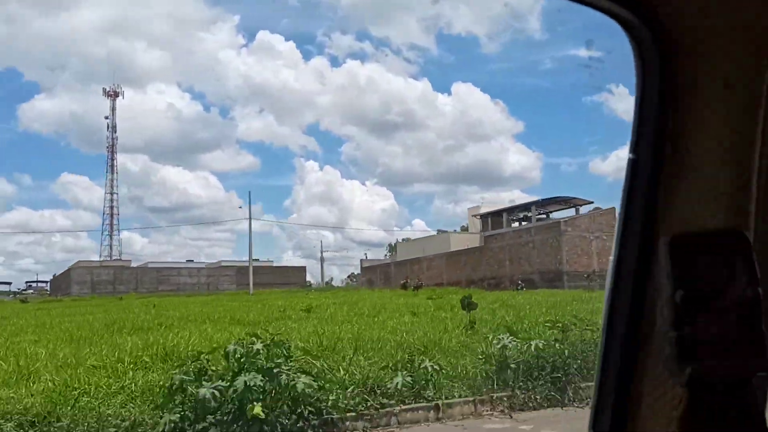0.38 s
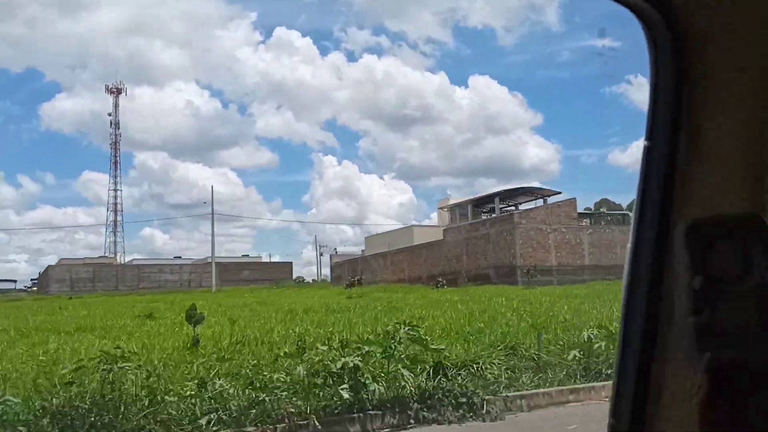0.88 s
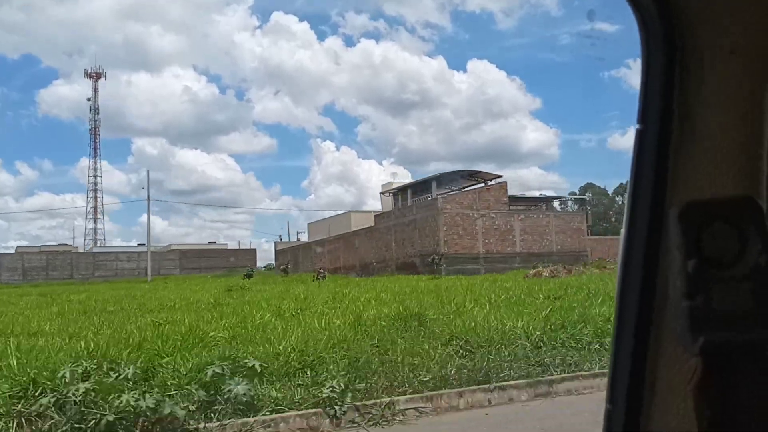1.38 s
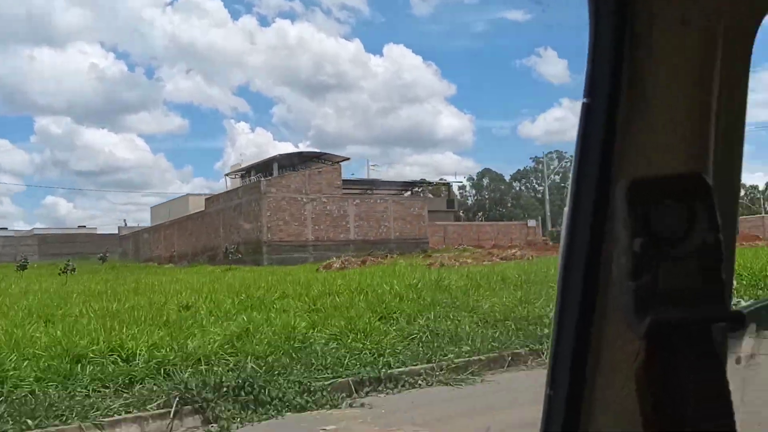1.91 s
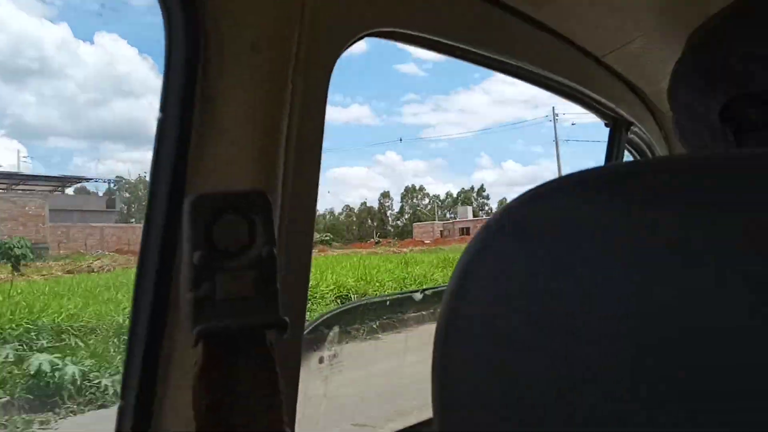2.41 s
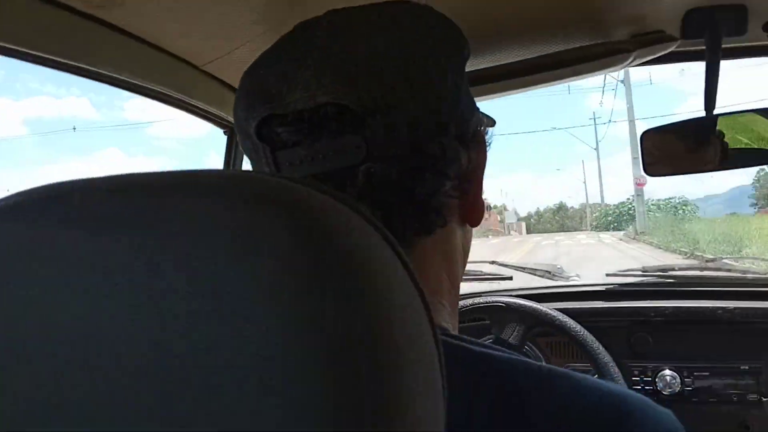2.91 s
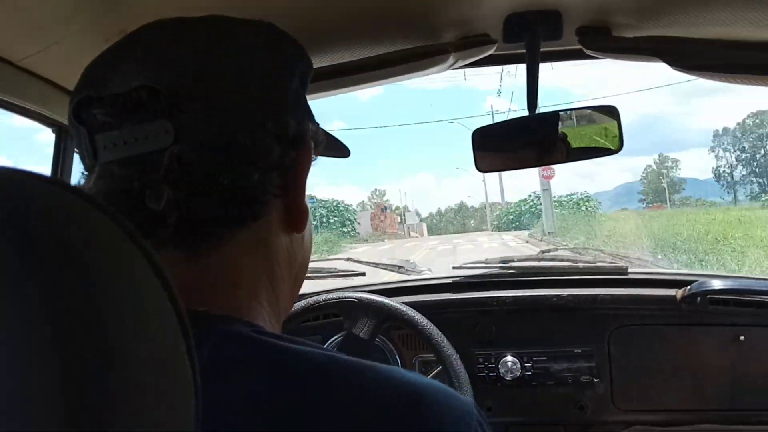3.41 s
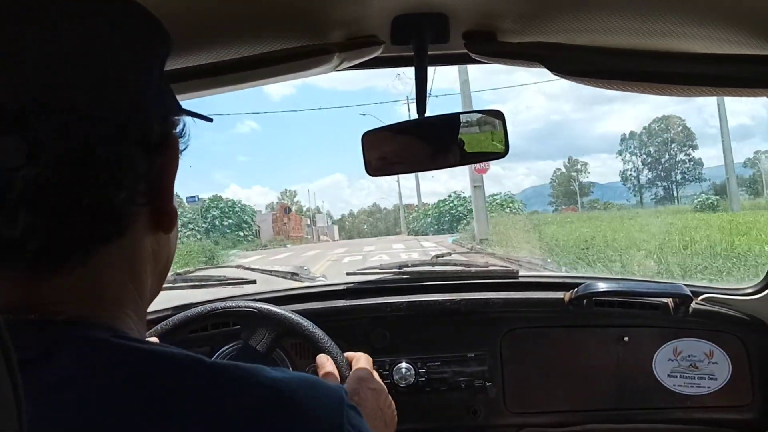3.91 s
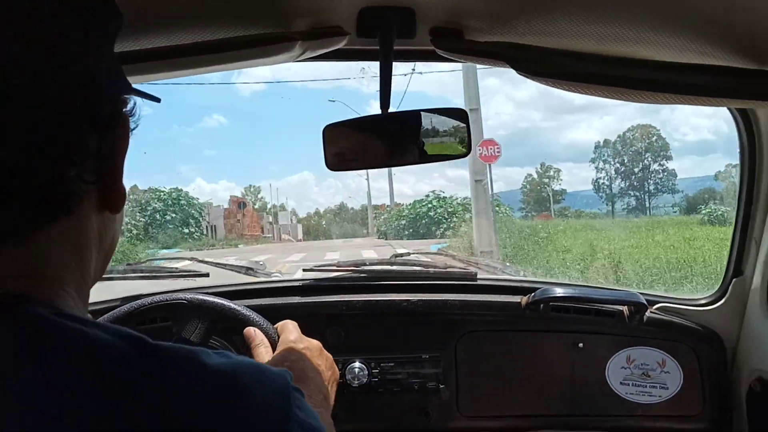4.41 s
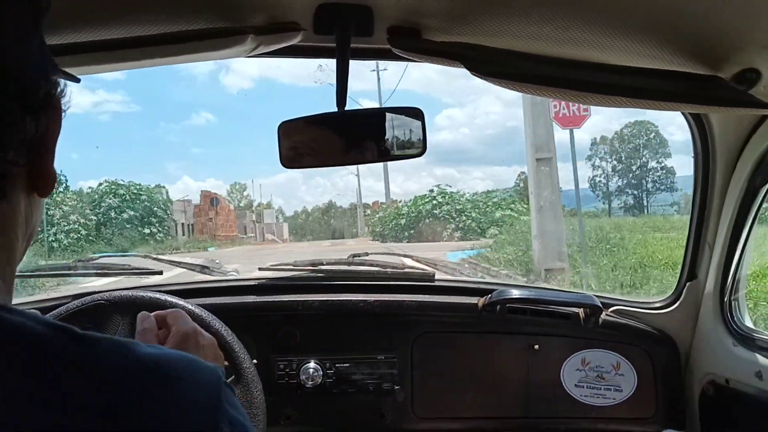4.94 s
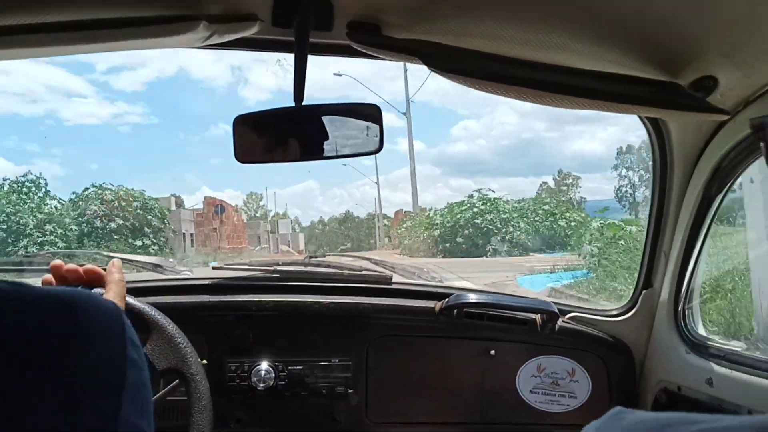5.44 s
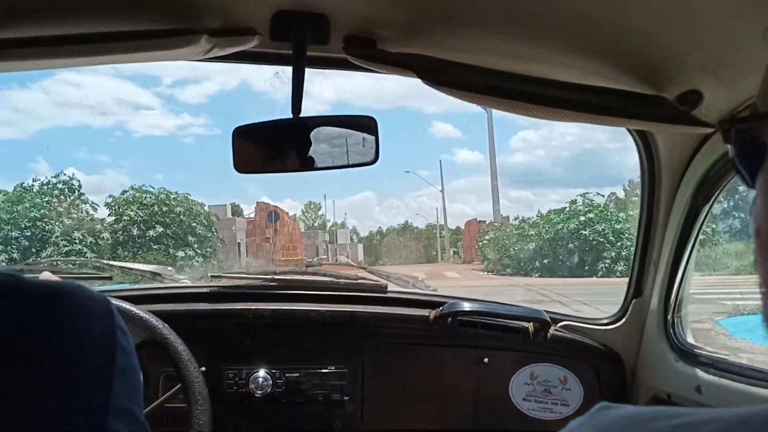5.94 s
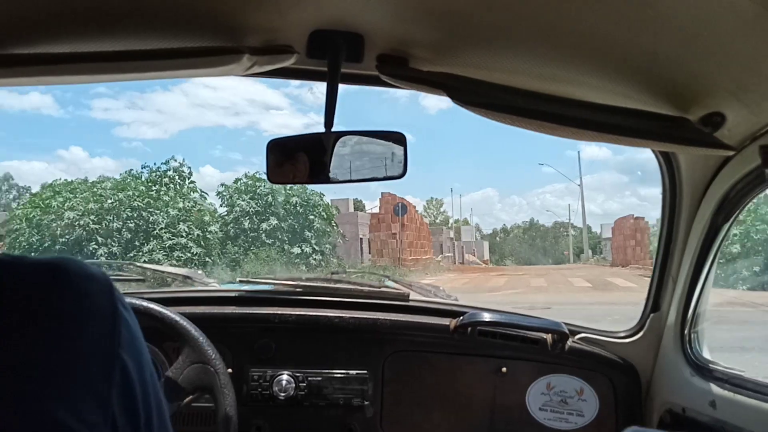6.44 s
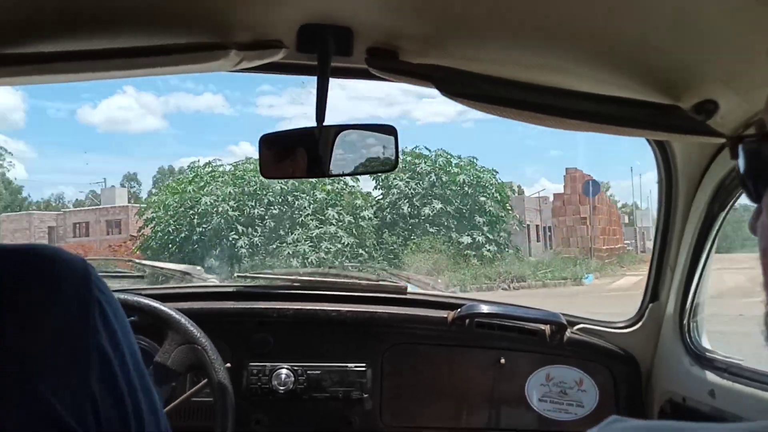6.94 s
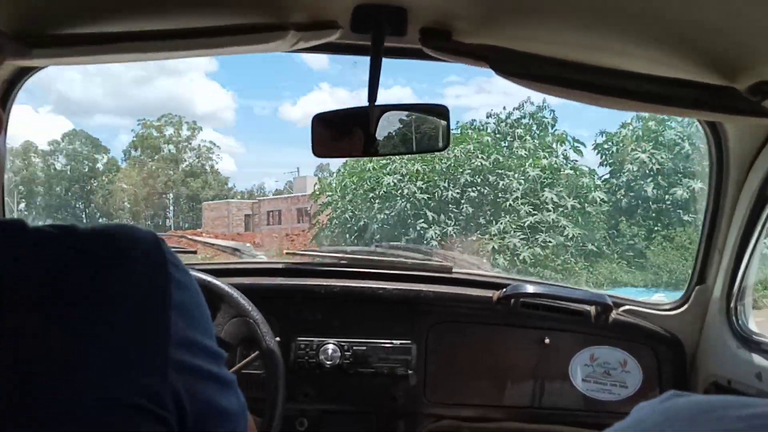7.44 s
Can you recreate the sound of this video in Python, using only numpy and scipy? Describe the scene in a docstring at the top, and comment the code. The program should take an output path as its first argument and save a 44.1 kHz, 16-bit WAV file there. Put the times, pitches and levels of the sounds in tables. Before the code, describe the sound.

A close, boxy cabin microphone picks up a throbbing old engine with road rumble, hiss and a faint rhythmic belt swish. After a gentle pull it coasts downward in pitch while little whistling squeaks chirp irregularly. A sharp trim clatter precedes a single heavy bump with scattered rattles after it; finally the slower engine turns rougher over coarse ground. Nobody speaks.

```python
"""The firing note of an old four-cylinder engine under load, heard from the back seat of a small car, comes first,
with tyre rumble, panel roar, hiss and a belt's swish. The car pulls gently, then coasts down to a junction;
load returns at the end. The engine is a sum of harmonics and weaker lines between them, the road and air are
shaped noise. Trim rattles as struck modes, the floor thuds over bumps, one of them hard, and rubber squeaks as
it slips on metal."""
import sys
import numpy as np
from scipy import signal
from scipy.fft import rfft, irfft
from scipy.io import wavfile
from scipy.ndimage import uniform_filter1d, minimum_filter1d

SR = 44100
rng = np.random.default_rng(int(sys.argv[2]) if len(sys.argv) > 2 else 0)


def master_out(mix):
    """Clip the mix to full scale and print it as 16-bit PCM to the path in sys.argv[1]."""
    frames = np.transpose(np.atleast_2d(mix))
    ceiling = np.clip(frames, -1, 1)
    pcm = np.round(ceiling * 32767).astype(np.int16)
    wavfile.write(sys.argv[1], SR, pcm)


def volts_from_decibels(level):
    """Turn decibel levels (scalar or array-like) into linear amplitude factors."""
    exponent = np.asarray(level, float) / 20
    return 10 ** exponent


N = 334278
TIME = np.arange(N) / SR


def evened(x):
    """Normalisation: scales a signal to unit rms."""
    return x / np.sqrt(np.mean(x ** 2) + 1e-20)


def curves(rows):
    """Linear interpolation: draws each column of a timed table over the whole scene."""
    s, *columns = np.transpose(rows)
    return [np.interp(TIME, s, column) for column in columns]


def read(points, hz):
    """Frequency response: reads a level in dB on a logarithmic frequency axis, -120 dB outside the table."""
    f, db = np.transpose(points)
    return np.interp(np.log(hz + 1), np.log(f + 1), db, left=-120, right=-120)


def step(s, blend_s):
    """Sigmoid transition: changes smoothly from 0 to 1 around s."""
    return .5 + .5 * np.tanh((TIME - s) / blend_s)


def swell(s, length_s):
    """Gaussian envelope: a bell of height 1 around s."""
    return np.exp(-((TIME - s) / length_s) ** 2)


def add(mix, s, sound):
    """Superposition: adds a sound to the mix from s seconds on."""
    part = mix[round(s * SR):][:len(sound)]
    part += sound[:len(part)]


def wander(per_s):
    """Random modulation: slow drift of unit size through per_s random values a second."""
    return np.interp(TIME * per_s, np.arange(400), rng.standard_normal(400)) * np.sqrt(1.5)


def noise(points, patchy_db):
    """Filtered noise: random short-time spectra in drifting patches, at unit rms."""
    hz = np.fft.rfftfreq(2048, 1 / SR)
    real, imaginary, patches = rng.standard_normal((N // 512 + 5, len(hz), 3)).T
    patches = uniform_filter1d(patches, size=20, axis=0)  # along frequency
    patches = evened(uniform_filter1d(patches, size=5, axis=1))  # along time
    level = volts_from_decibels(read(points, hz)[:, None] + patchy_db * patches)
    spectra = (real + 1j * imaginary) * level
    return evened(signal.istft(spectra, nperseg=2048, noverlap=1536)[1][:N])


def puffs(turns, tail, uneven_db):
    """Periodic pulses: a sudden burst at each whole turn, of random size, decays by 1/e in tail turns."""
    sizes = volts_from_decibels(uneven_db * rng.standard_normal(600))
    size = sizes[np.floor(turns).astype(int) % 600]
    return uniform_filter1d(size * np.exp(-(turns % 1) / tail), size=90)


def ring(modes, factor, spread, stretch):
    """Modal synthesis: dying sines of a struck body, detuned a little at each blow, at unit peak."""
    t = np.arange(SR // 6)[:, None] / SR
    hz, db, t60 = np.transpose(modes)
    detune = 1 + spread * rng.standard_normal(len(hz))
    hz = np.minimum(hz * factor * detune, 16000)
    decay = volts_from_decibels(db - 60 * t / (t60 * stretch))
    sound = (decay * np.sin(2 * np.pi * hz * t)).sum(1)
    return sound / abs(sound).max()


# firing tone and its multiples: multiple, level while pulling/dB, change once coasting/dB, change in the turn/dB
FIRING_TONES = [(1, -19.5, 1, -6), (2, -26, -7.5, 7.5), (3, -23, -9, -4), (4, -47, -0.5, 20.5)]
# lead of each firing tone, which shapes the exhaust pulse: phase/turns
PULSE_LEAD = [-.15, -.42, .2, 0]
# unequal cylinders add lines between and above the firing tones: multiple of the firing rate, relative level/dB
UNEVEN_LINES = [(.5, -56), (.75, -31.5), (1.25, -31), (1.5, -36.5), (1.75, -29.5), (2.25, -37),
                (2.5, -32.5), (2.75, -39), (3.25, -43.5), (3.5, -46), (5, -45.5), (5.5, -51.5), (6, -45.5),
                (8, -51), (8.5, -49.5), (9, -49.5), (12, -52)]
# how the cabin passes each firing tone: f/Hz, level/dB
CABIN_RESPONSE = [(40, -1), (49, -7), (55, -1), (62, .5), (67, -1.5), (87.5, -6), (90.5, 4.5), (101, -7),
                  (108, 4.5), (120, 3), (131, -4), (150, -4.5), (165, 2.5), (180, -1.5), (195, 1.5),
                  (215, -6), (240, 7.5), (252, -5), (270, -9)]
# the uneven lines swell as they pass these resonances: f/Hz, width/Hz, level/dB
CABIN_BOOMS = [(368.4, 16.3, 7.5), (326, 5.9, 8.5), (207, 16, 5.5)]
# the firing tones dip briefly: t/s, level/dB
TONE_DIPS = [(1.1, -3.5), (3.95, -2.5), (4.23, -6)]


def engine(hz, firings, throttle):
    """Harmonic synthesis: firing tones, and weaker lines that flutter as the cylinders fire unevenly."""
    coast = step(4.19, blend_s=.097)  # the foot comes off the pedal
    turn = step(7.07, blend_s=.029)  # the note shifts from the odd to the even multiples
    dip_db = sum(db * swell(s, length_s=.075) for s, db in TONE_DIPS)
    tones = np.zeros(N)
    for (k, db, coast_db, turn_db), lead in zip(FIRING_TONES, PULSE_LEAD):
        level_db = db + coast_db * coast + turn_db * turn + read(CABIN_RESPONSE, k * hz) + dip_db
        level_db = level_db + (.63 + 1.4 * coast) * wander(22)
        phase = k * firings + lead + .019 * wander(9)  # turns
        tones += volts_from_decibels(level_db) * np.cos(2 * np.pi * phase)
    for k, db in UNEVEN_LINES:
        boom_db = sum(top_db * np.exp(-((k * hz - boom_hz) / width) ** 2)
                      for boom_hz, width, top_db in CABIN_BOOMS)
        level_db = db + boom_db + 4.1 * (throttle - 1) + 4 * wander(8) - 3
        phase = k * firings + rng.random() + .13 * wander(6)  # turns
        tones += volts_from_decibels(level_db) * np.cos(2 * np.pi * phase)
    return np.sqrt(2) * tones  # table levels are rms


# level of the tyre rumble: t/s, level/dB
ROAD_LEVEL = [(0, -33), (.74, -38), (.95, -27), (1.98, -27.5), (2.3, -31), (2.97, -25), (4.28, -24.5),
              (4.8, -30), (5.42, -27), (5.7, -29.5), (6.1, -21.5), (6.5, -26), (7, -24), (7.58, -21)]
# spectrum of the tyre rumble: f/Hz, relative density/dB per Hz
RUMBLE_SPECTRUM = [(12, -39), (20, -24), (38, -4), (56, 0), (75, -1.5), (162, -2), (201, -18), (237, -11.5),
                   (394, -22), (420, -30), (550, -48), (920, -120)]
# level of the coarser ground in the turn: t/s, level/dB
COARSE_LEVEL = [(0, -57), (6.1, -44), (6.8, -31.5), (7.2, -25), (7.58, -27)]
# spectrum of the coarser ground: f/Hz, relative density/dB per Hz
COARSE_SPECTRUM = [(60, -25), (90, -8), (135, -4), (178, 0), (225, -5.5), (300, -27)]
# spectrum of the panel roar: f/Hz, relative density/dB per Hz
ROAR_SPECTRUM = [(140, -6.5), (230, 1.5), (273, -12.5), (307, -3), (373, -1), (448, -5.5), (526, -9.5),
                 (766, -9.5), (826, -9), (1180, -14.5), (1680, -21.5), (2320, -20.5), (3000, -32),
                 (3900, -37), (6600, -120)]
# spectrum of the hiss under load: f/Hz, relative density/dB per Hz
PULLING_HISS = [(880, -13), (1500, -1), (1690, -28), (1790, -1), (1940, -6.5), (2340, 0), (2940, -5.5),
                (6470, -7.5), (7890, -18), (9990, -19.5), (13400, -30.5), (15100, -23), (15900, -28)]
# spectrum of the hiss without load: f/Hz, relative density/dB per Hz
COASTING_HISS = [(880, -21), (1500, -3), (1810, -4.5), (2000, 3.5), (2140, -5), (2390, 1), (2790, -2.5),
                 (6470, -7.5), (8200, -19.5), (11000, -29), (13400, -43), (14800, -32), (15900, -36)]
# spectrum of the loudest valve: f/Hz, relative density/dB per Hz
VALVE_SPECTRUM = [(4500, -25), (6500, 10), (8500, -1), (10500, -5), (13500, -9), (15000, 0), (15900, -4)]


def road_and_air(firings, throttle):
    """Amplitude-modulated noise: tyre rumble, panel roar and hiss; load makes roar and hiss throb with the firings."""
    cycle = puffs(firings / 4 + .13, tail=.25, uneven_db=1.5)  # one valve per four firings is loudest
    each_firing = puffs(firings + .4, tail=.35, uneven_db=1.5)
    throb = 1 + throttle * (.4 * cycle + .35 * each_firing)

    rumble_db = curves(ROAD_LEVEL)[0] + .6 * wander(10)
    rumble = volts_from_decibels(rumble_db) * noise(RUMBLE_SPECTRUM, patchy_db=1)
    rumble += volts_from_decibels(curves(COARSE_LEVEL)[0]) * noise(COARSE_SPECTRUM, patchy_db=1)

    # the panels roar louder for a moment after the hard bump
    roar_db = -32.5 + 3 * swell(6.23, length_s=.12) + .58 * wander(25)
    roar = volts_from_decibels(roar_db) * noise(ROAR_SPECTRUM, patchy_db=1) * evened(throb ** .51)

    hiss = np.sqrt(throttle) * noise(PULLING_HISS, patchy_db=1.56) * evened(throb)
    hiss += np.sqrt(1 - throttle) * noise(COASTING_HISS, patchy_db=1.5)
    hiss *= volts_from_decibels(-44.5 + 1.07 * wander(30))

    valve = volts_from_decibels(-58.5) * throttle ** .98 * evened(cycle) * noise(VALVE_SPECTRUM, patchy_db=6.5)
    return rumble + roar + hiss + valve


# the belt creeps on its pulley: t/s, lead/laps
BELT_CREEP = [(0, -.38), (2.85, .2), (4.9, .52), (7.58, -.3)]
# spectrum of the belt joint's swish: f/Hz, relative density/dB per Hz
SWISH_SPECTRUM = [(5000, -22), (7500, -5), (8800, -5), (10000, -5), (10900, 0), (11700, -12), (13500, -24),
                  (15000, -12), (15900, -16)]


def belt(hz, firings, throttle):
    """Periodic gating of noise: a belt joint swishes once a lap, plainest at high speed without load."""
    laps = firings * .3465 + curves(BELT_CREEP)[0] + 1
    swish = puffs(laps, tail=.22, uneven_db=1.2)
    speed_db = 11 * np.log2(hz / 64)
    load_db = -6.2 * np.maximum(throttle - .55, 0) / .57
    return volts_from_decibels(-61.5 + speed_db + load_db) * evened(swish) * noise(SWISH_SPECTRUM, patchy_db=2.5)


# jolts of loose trim: t/s, peak level/dB, f of the piece's strongest mode/Hz, ring share 0-1 (held to 0.7)
RATTLES = [(.196, -31, 5200, .1), (.279, -20, 730, 0.56), (1.045, -28, 800, .4), (2.933, -23.5, 2310, 0.38),
           (5.223, -16, 1045, 0.49), (5.313, -12.5, 2910, 0.55), (5.323, -21.5, 2950, 0.4),
           (5.336, -31, 2840, 0.6), (6.047, -16.5, 960, .2), (6.109, -28, 2300, 0.4),
           (6.135, -15, 3480, 0.52), (6.143, -18, 1000, .4), (6.157, -24, 3450, .25),
           (6.205, -22, 695, .35), (6.254, -25.5, 2600, .2), (6.3, -29, 1200, 0.3),
           (6.322, -22, 1150, 0.54), (6.382, -28.5, 2000, .3), (6.46, -27.5, 4840, 0.2),
           (6.536, -25, 1300, 0.1), (6.608, -27, 1000, 0.1), (6.791, -33, 2900, .2), (7.01, -24, 4000, .3),
           (7.219, -18, 2890, 0.14), (7.298, -34, 4700, .2), (7.348, -31, 2780, .4)]
# modes of a reference trim piece, second row strongest: f/Hz, level/dB, t60 before shortening/s
TRIM_MODES = [(1800, -9, .06), (2900, 0, .085), (3150, -8, .05), (4140, -5, .05), (4720, -8, .05),
              (5740, -14, .04), (6520, -17, .04)]
# spectrum of the contacts heard directly: f/Hz, level/dB
CONTACT_SPECTRUM = [(300, -29), (900, -2.5), (3000, 4), (6500, -1), (8500, -9.5), (12500, -20),
                    (15000, -20), (16500, -30)]


def rattle(db, piece_hz, ringing):
    """Impact excitation: quick contacts make a noise burst, heard directly and through the trim's modes."""
    t = np.arange(SR // 6) / SR
    hz = np.fft.rfftfreq(len(t), 1 / SR) + 1
    hits = rng.random(len(t)) < 400 / SR  # 400 contacts per second on average
    contacts = np.convolve(hits, np.exp(-np.arange(200) / 60))[:len(t)] + .5
    envelope = volts_from_decibels(-60 * t / .06) * np.minimum(t / .0035, 1)  # t60 60 ms, onset 3.5 ms
    burst = rfft(rng.standard_normal(len(t)) * contacts * envelope)

    factor = piece_hz / TRIM_MODES[1][0]
    tilt_db = -.5 + 7 * np.log2(factor)  # dB per octave: smaller, higher pieces are brighter
    tilt = volts_from_decibels(tilt_db * np.log2(hz / 3000))
    direct = evened(irfft(burst * tilt * volts_from_decibels(read(CONTACT_SPECTRUM, hz)), len(t)))

    blow = burst + 2.3 * np.sqrt(np.mean(abs(burst) ** 2))  # the first contact is a clean tap
    modes = rfft(ring(TRIM_MODES, factor, spread=.01, stretch=.6))
    body = evened(irfft(blow * modes, len(t)))
    share = np.clip(ringing, 0, .7)
    sound = (1 - share) * direct + share * body
    return volts_from_decibels(db) * sound / abs(sound).max()


# the wheels meet bumps: t/s, nominal peak level/dB
BUMPS = [(1.06, -18), (4.057, -17), (4.2, -17), (6.0405, 6), (6.204, -12), (6.25, -15), (7.225, -16),
         (7.458, -18)]
# modes of the floorpan before scaling: f/Hz, level/dB, t60/s
FLOORPAN_MODES = [(131, 0, .2), (112, -3, .14), (200, -5, .07), (250, -2, .06), (310, -6, .05)]


def thud(db):
    """Modal response: a bump strikes the floorpan, which rings low and dies away."""
    sound = -ring(FLOORPAN_MODES, .95, spread=.012, stretch=.85)
    onset = np.minimum(np.arange(len(sound)) / (.002 * SR), 1)  # 2 ms
    return volts_from_decibels(db) * sound * onset


# rubber on metal slips: t/s, nominal level/dB, f/Hz, rise as a share of f (negative falls)
SQUEAKS = [(3.62, -36.5, 1930, .06), (3.84, -35, 1838, .03), (3.972, -37, 1810, .03),
           (4.193, -27, 1946, .01), (4.292, -35, 2130, .03), (4.51, -31.5, 1910, 0.011),
           (4.676, -36, 1820, .02), (4.736, -26, 2020, -0.0028), (4.863, -26, 2020, .035),
           (5.054, -26, 2036, -0.0092), (5.115, -32, 2120, 0.11), (5.208, -43.5, 7400, -.04),
           (5.271, -25, 2100, 0.19), (5.888, -36, 2050, .03)]
# overtones of a squeak: multiple, relative level/dB
SQUEAK_OVERTONES = [(2, -4), (3, -4)]


def squeak(db, hz, rise):
    """Stick-slip friction: a brief gliding whistle with overtones; the grip trembles, so it is a little hoarse."""
    stronger_db = db + 37
    length_s = .016 + .0006 * stronger_db + .07 * abs(rise)  # stronger and wider slips last longer
    overtone_db = -25 + 1.13 * stronger_db  # overtones grow with strength
    u = np.linspace(0, 1, round(max(length_s, .008) * SR))
    tremble = uniform_filter1d(rng.standard_normal((2, len(u))), size=70) * 8
    turns = np.cumsum(hz * (1 + rise * (u - .5) + .025 * tremble[0])) / SR
    tone = np.sin(2 * np.pi * turns)
    for k, level_db in SQUEAK_OVERTONES:
        if k * hz < 16000:
            tone += volts_from_decibels(overtone_db + level_db) * np.sin(2 * np.pi * k * turns)
    envelope = np.sin(np.pi * u ** .63) ** .63
    return volts_from_decibels(db - 1.5 + 2.3 * tremble[1]) * tone * envelope


# engine speed: t/s, firing rate f/Hz
FIRING_RATE = [(0, 60), (1.25, 61.65), (2, 62.8), (3.1, 65.3), (3.6, 65.8), (3.95, 65.5), (4.32, 64.1),
               (4.7, 62.7), (5.02, 60.9), (5.9, 51.2), (6.1, 49.5), (6.4, 47.6), (6.75, 46.1), (7, 45.3),
               (7.4, 44.8), (7.58, 44)]
# engine load: t/s, throttle 0-1
THROTTLE = [(0, 0.98), (2.5, 1), (3.3, 0.95), (4.2, 0.52), (5, 0.17), (6.5, 0.4), (7.05, 0.18),
            (7.58, 0.77)]


def scene():
    """Superposition: the continuous sources share one engine speed and load; the impacts and slips are added."""
    (hz,) = curves(FIRING_RATE)
    firings = np.cumsum(hz) / SR
    throttle = np.clip(curves(THROTTLE)[0], 0, 1)
    cabin = engine(hz, firings, throttle) + road_and_air(firings, throttle) + belt(hz, firings, throttle)
    for s, *jolt in RATTLES:
        add(cabin, s, rattle(*jolt))
    for when, size, bright in rng.random(size=(16, 3)):  # faint jolts at random moments
        faint_db = -37 + 2.5 * (2 * size - 1)
        add(cabin, when * N / SR, rattle(faint_db, 1500 + 3000 * bright, .3))
    for s, db in BUMPS:
        add(cabin, s, thud(db))
    for s, *slip in SQUEAKS:
        add(cabin, s, squeak(*slip))
    return cabin[None]


def band_limit(x):
    """A steep low-pass at the top of the band."""
    return signal.sosfilt(signal.butter(12, 17080, fs=SR, output="sos"), x)


def record(dry):
    """Dynamic range control: the microphone drops the deepest bass; a look-ahead limiter ducks around loud peaks."""
    heard = signal.sosfilt(signal.butter(2, 38, "high", fs=SR, output="sos"), dry)
    peak = -minimum_filter1d(-abs(heard[0]), size=700)  # centred window, so it looks ahead
    peak_db = 20 * np.log10(peak + 1e-9)
    fall = TIME * 90  # recovers 90 dB per second
    held_db = np.maximum.accumulate(peak_db + fall) - fall
    over_db = np.maximum(held_db + 9, 0)  # above a threshold of -9 dB
    ducked = heard / volts_from_decibels(.54 * uniform_filter1d(over_db, size=300))
    return band_limit(ducked)


dry = scene()
out = record(dry)
master_out(out)
```